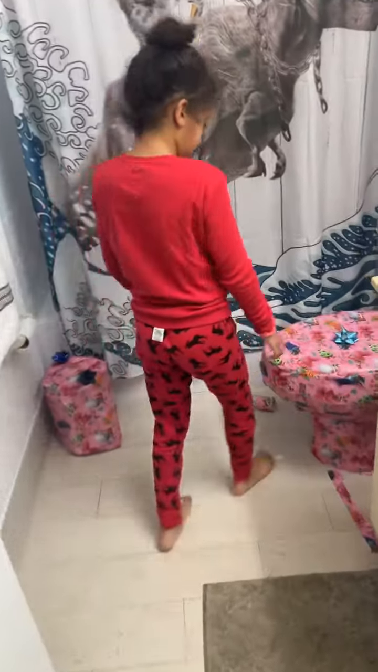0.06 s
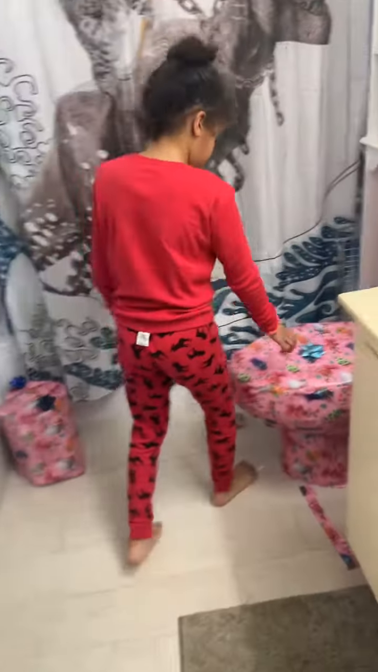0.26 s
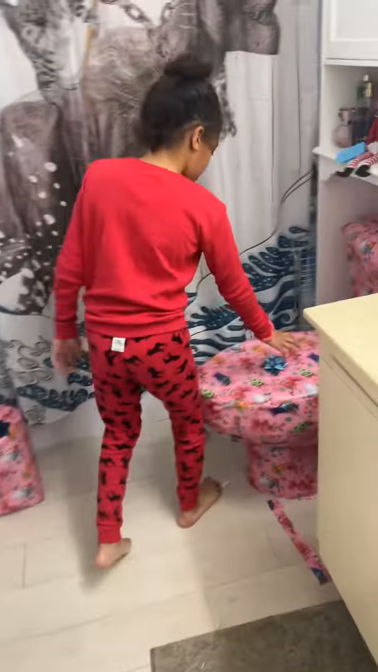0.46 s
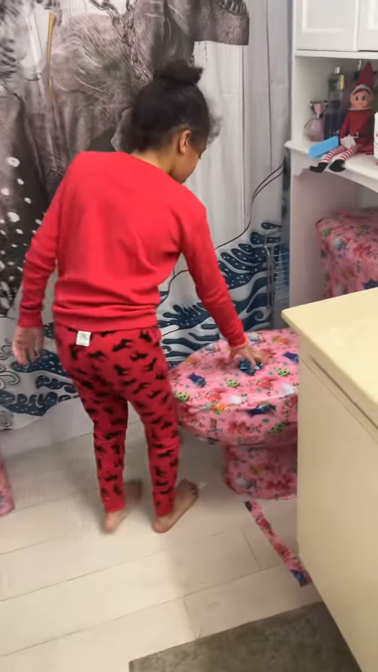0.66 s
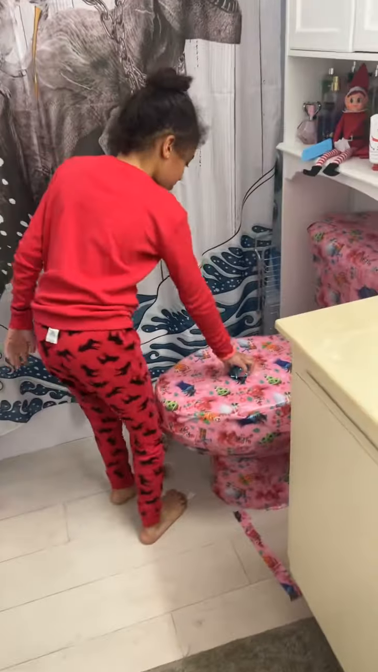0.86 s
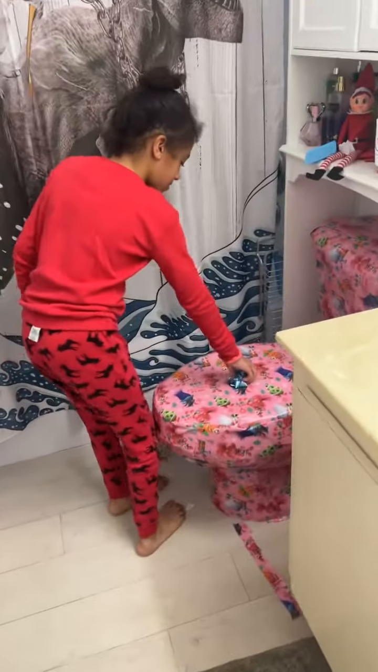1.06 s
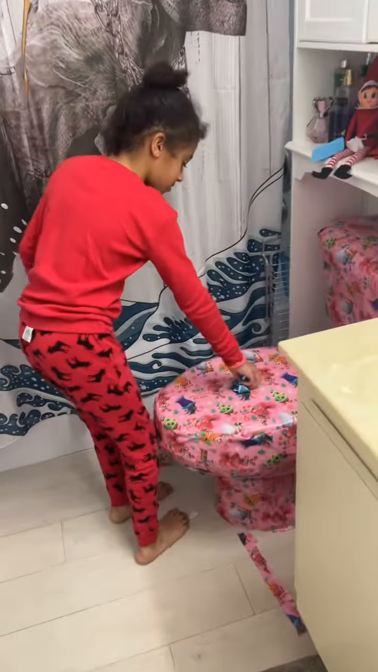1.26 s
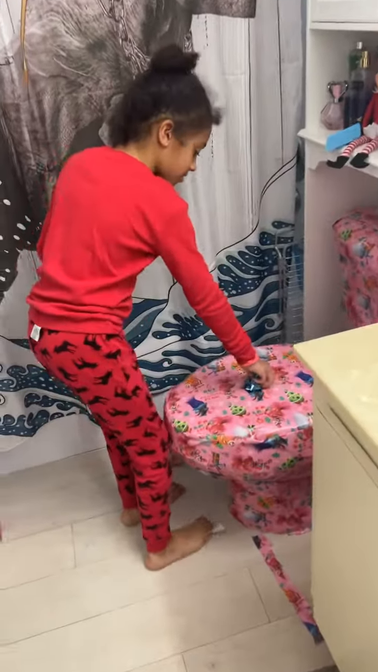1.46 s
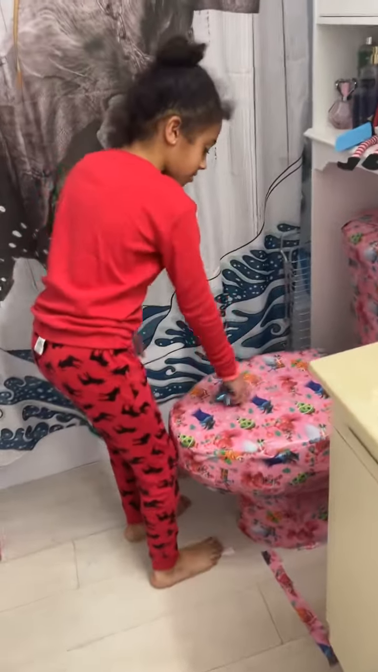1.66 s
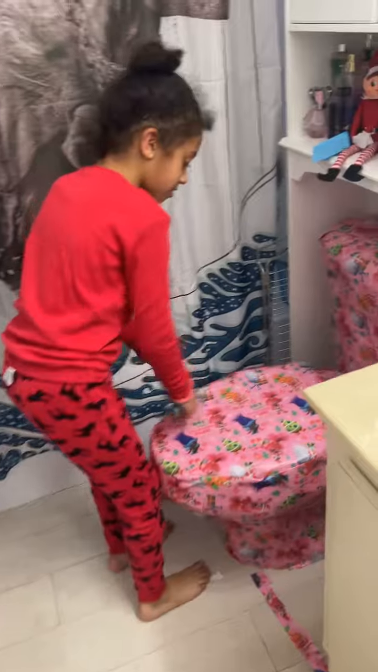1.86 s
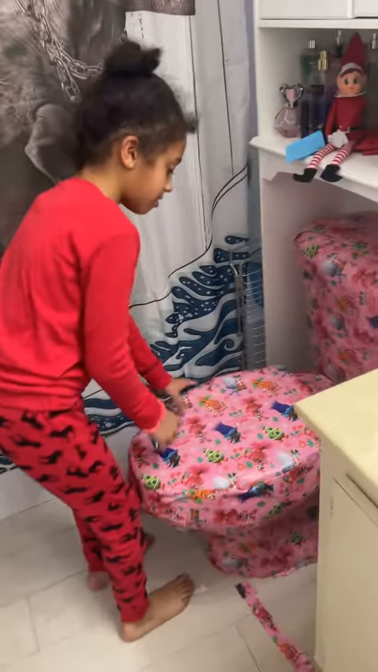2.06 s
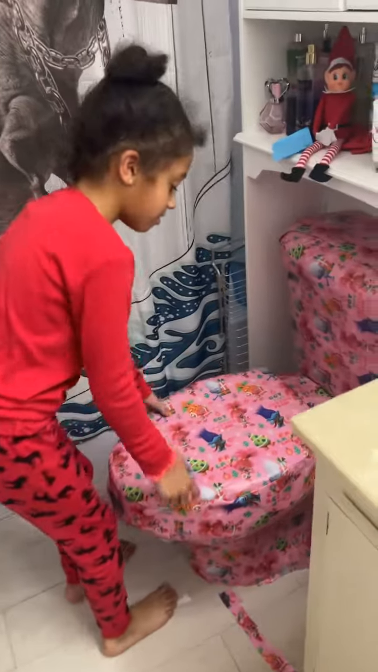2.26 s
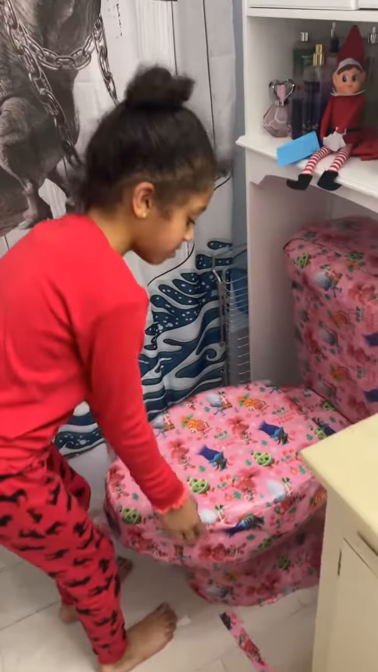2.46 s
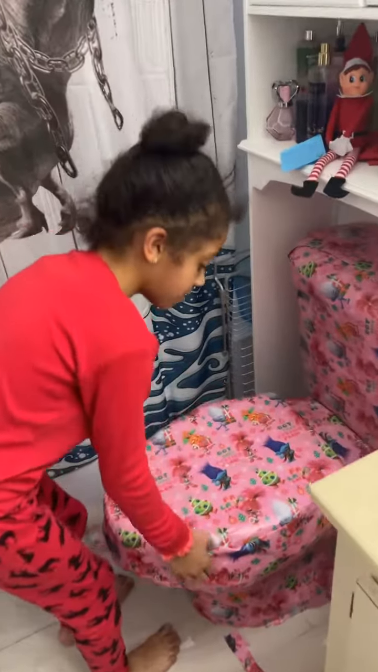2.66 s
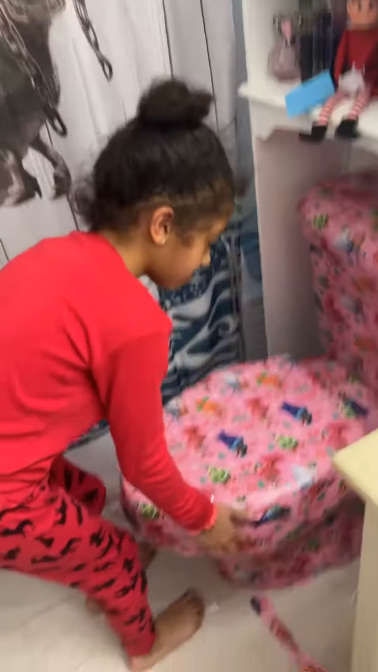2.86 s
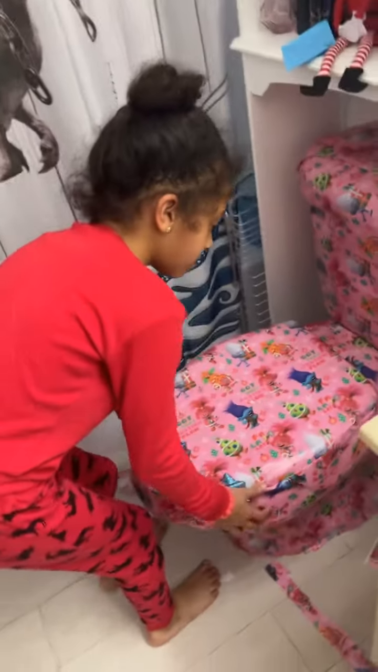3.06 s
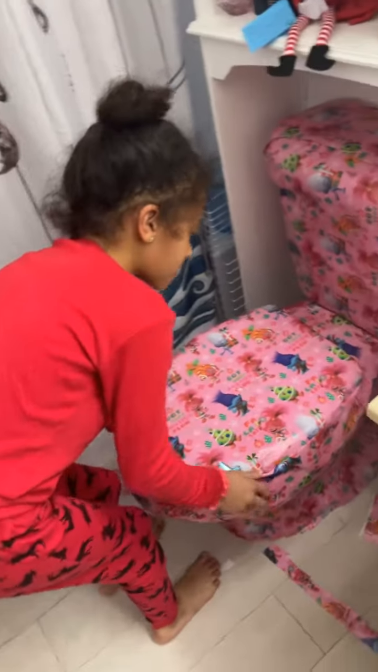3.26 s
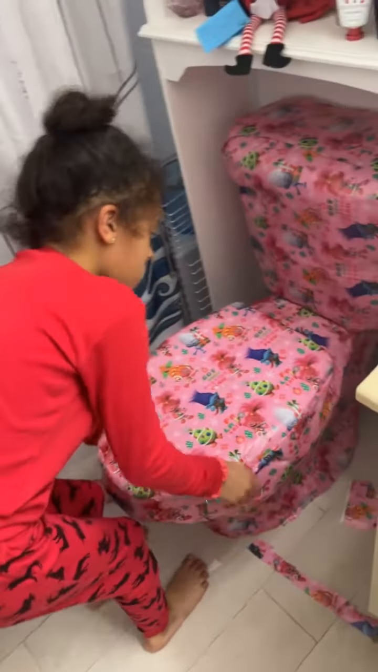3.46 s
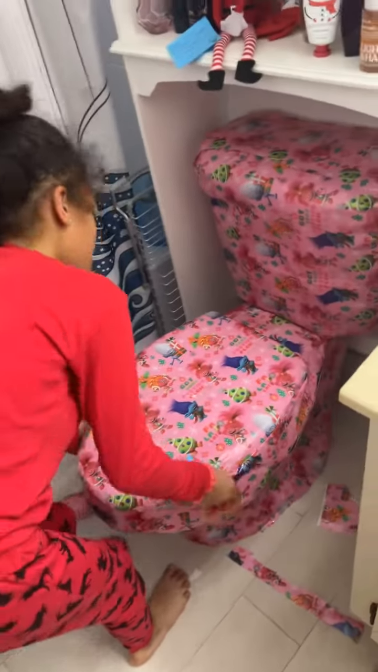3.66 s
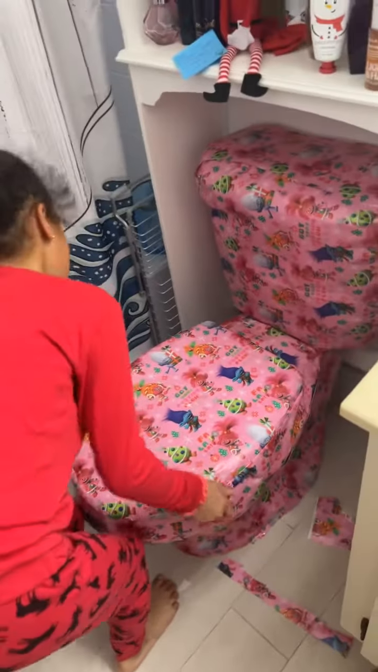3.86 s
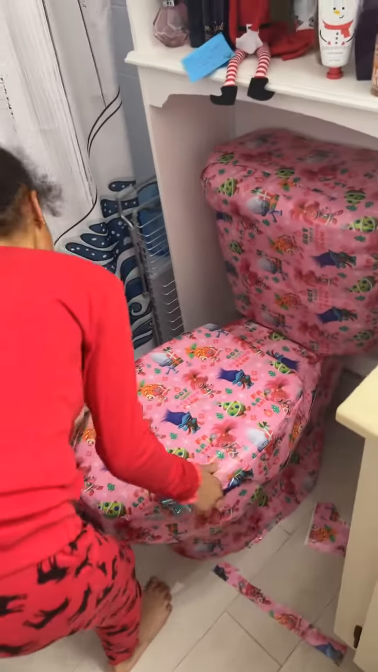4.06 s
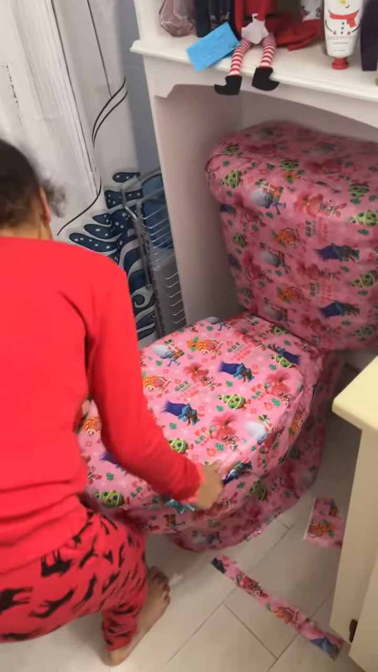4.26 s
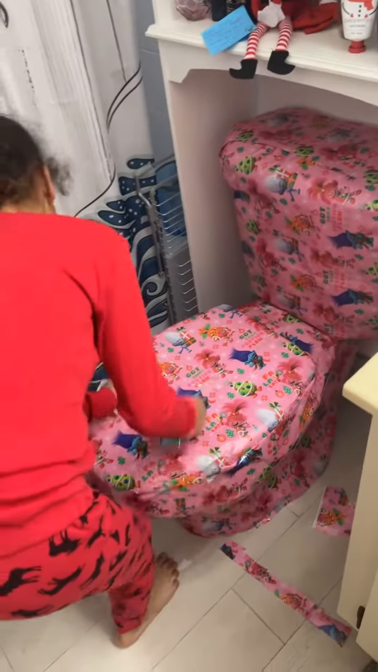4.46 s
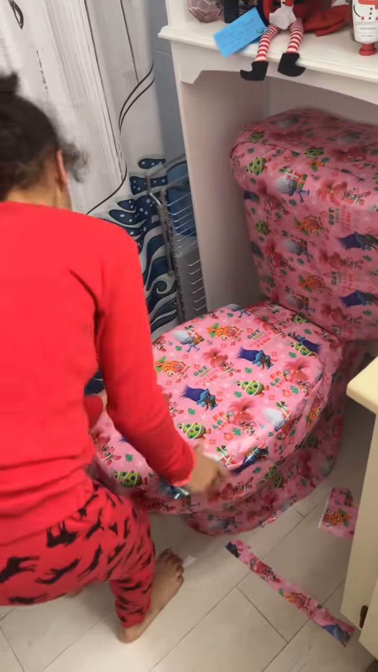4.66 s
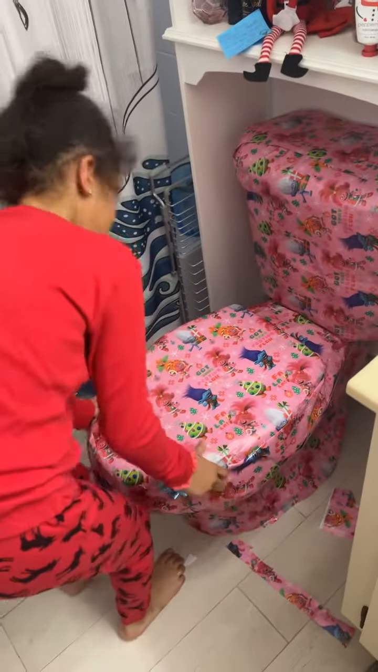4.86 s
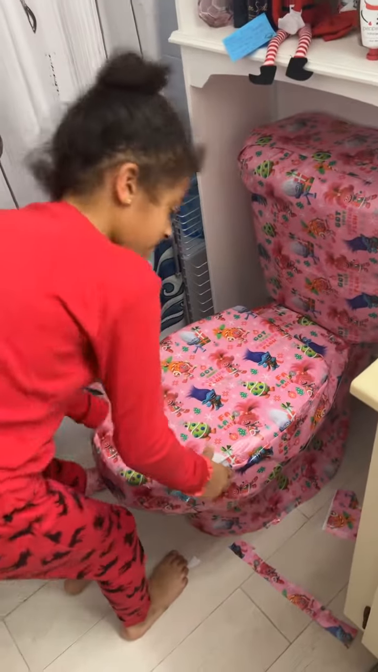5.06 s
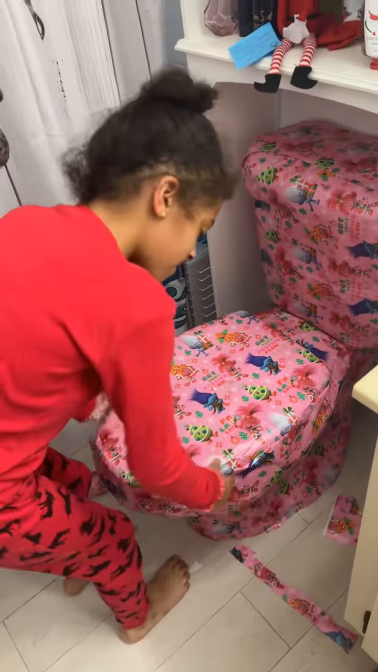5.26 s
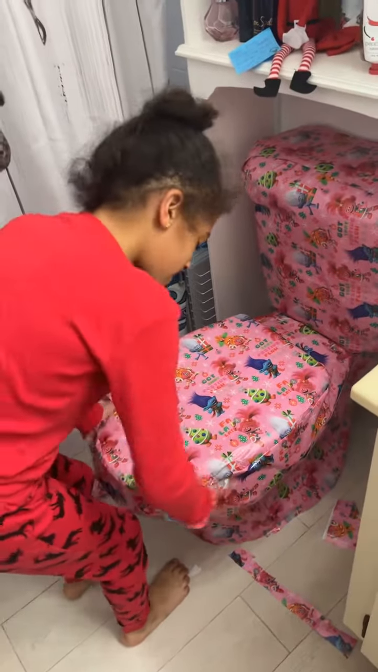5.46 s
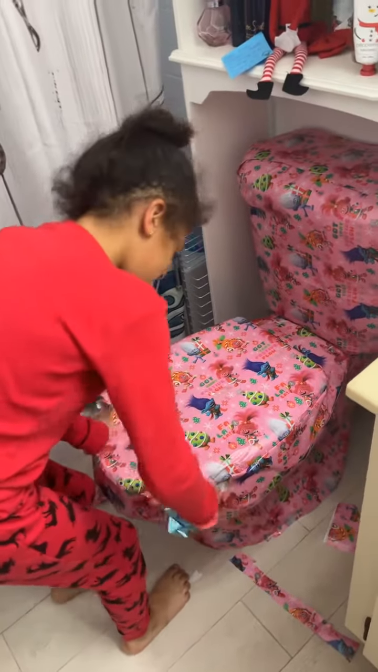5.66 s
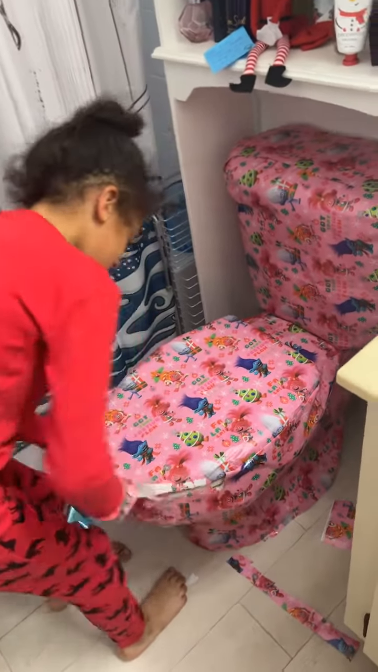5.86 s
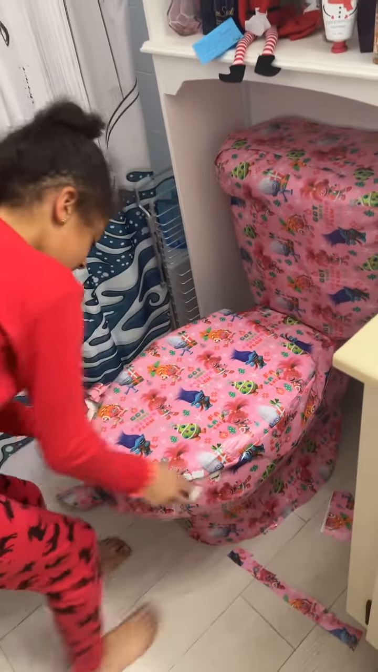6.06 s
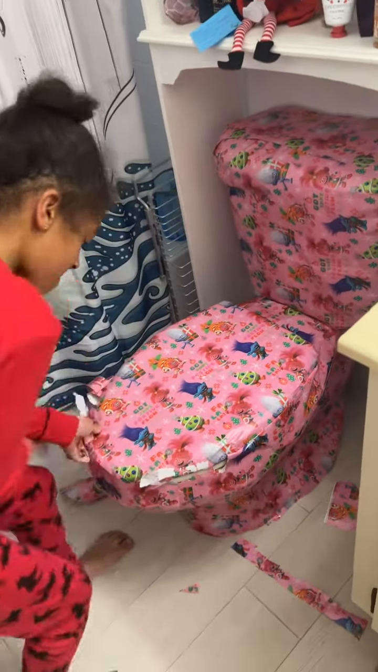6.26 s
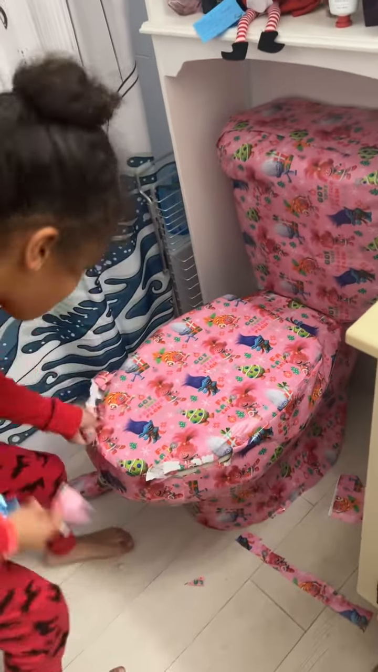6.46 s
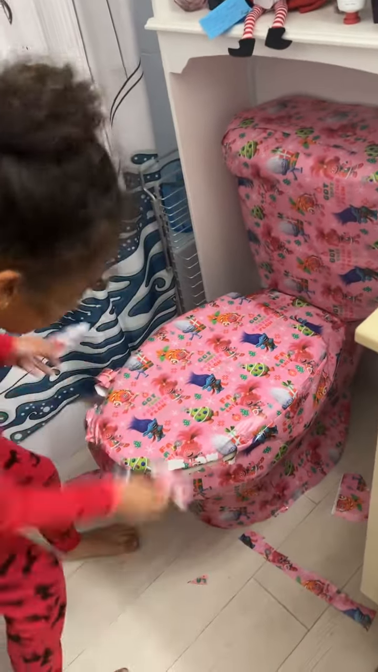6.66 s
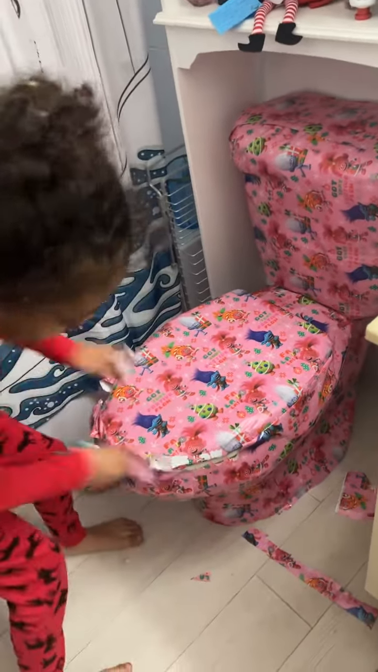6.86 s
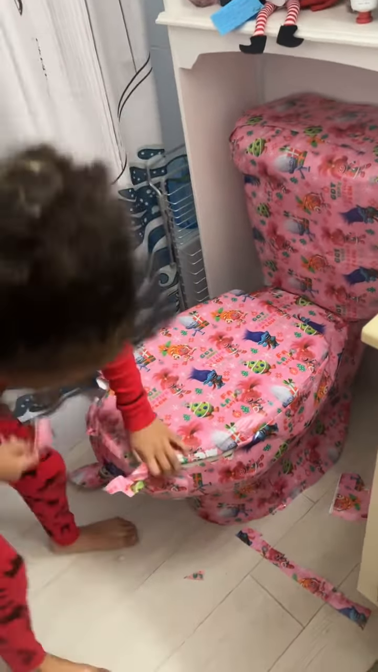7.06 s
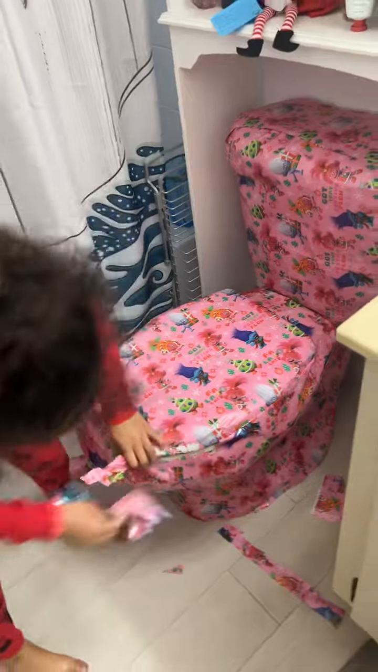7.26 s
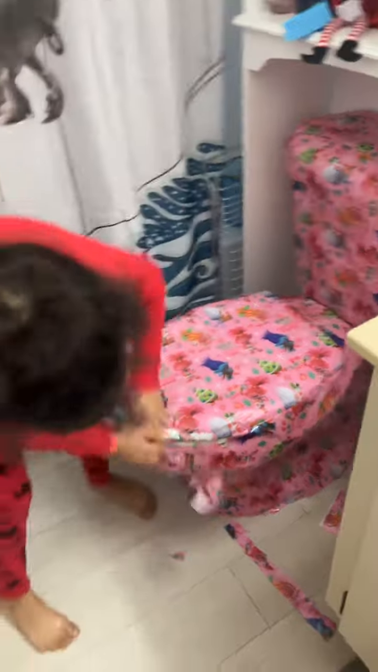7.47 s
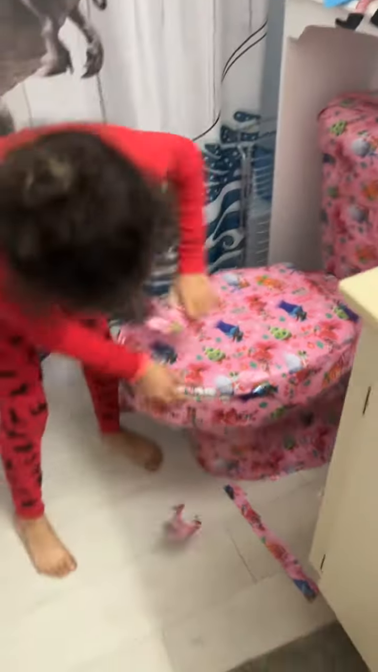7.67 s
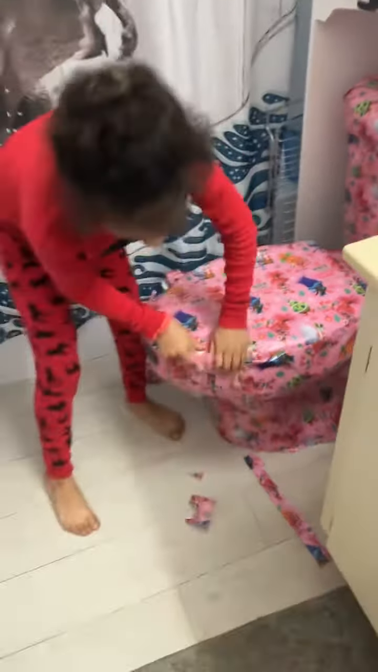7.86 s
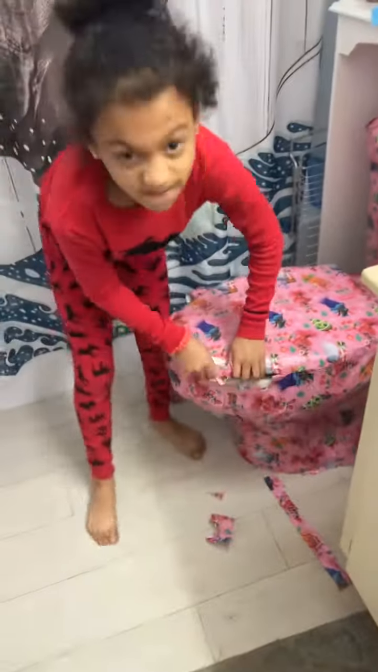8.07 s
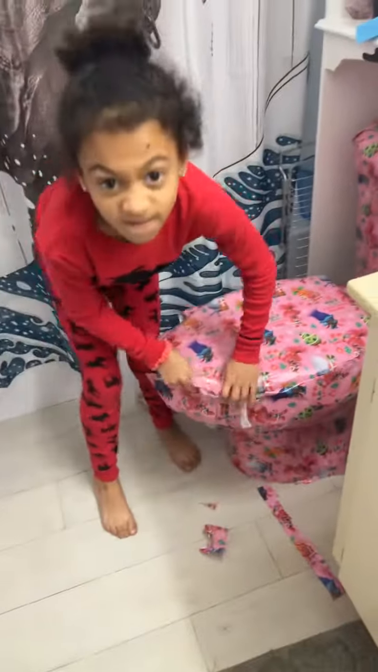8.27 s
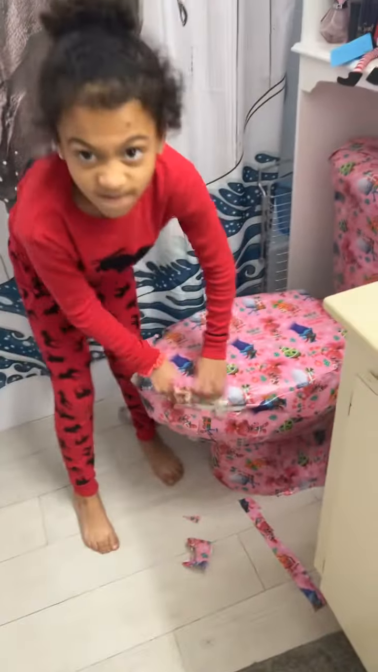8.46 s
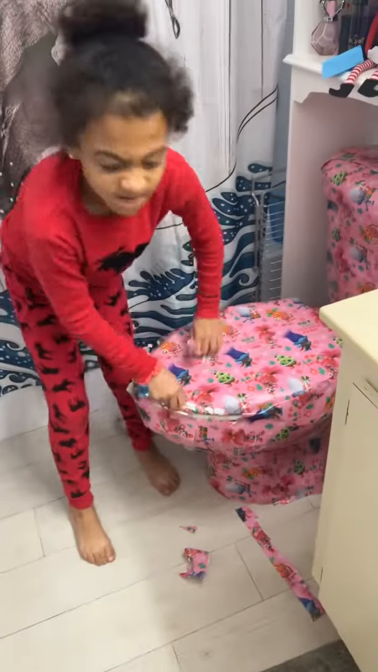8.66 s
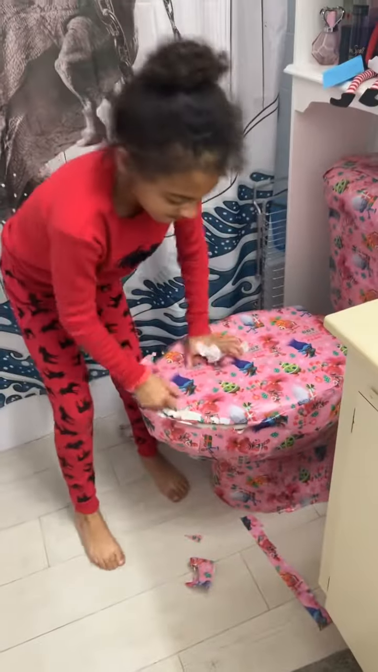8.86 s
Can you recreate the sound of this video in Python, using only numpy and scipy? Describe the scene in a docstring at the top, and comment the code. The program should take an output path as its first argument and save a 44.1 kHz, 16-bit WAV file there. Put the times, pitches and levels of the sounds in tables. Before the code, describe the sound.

Crisp paper is pulled and torn in irregular bursts around a hollow toilet lid. Quiet fumbling and sparse ticks open the scene; after a brief squeaky scrape the crackling thickens. Later tears snap brightly and knock the lid, the strongest ones near the end, before softer crumples. Close single microphone, short hard-walled reflections, faint low room tone.

```python
"""Gift paper on a lidded bowl

Hands scratch, pull and tear thin paper round a hollow lidded bowl in a small hard-walled bathroom.
Buckles and breaking creases ring paper facets; drag noise and blows drive lid and low boom modes.
A finger scrape is a slip train through resonances. Noise tails make the bright room; air is shaped noise.
One microphone.
"""
import sys
import numpy as np
from scipy import signal
from scipy.fft import rfft, irfft
from scipy.io import wavfile

SR = 44100
rng = np.random.default_rng(int(sys.argv[2]) if len(sys.argv) > 2 else 0)


def master_out(mix):
    """Clip the mix to full scale and print it as 16-bit PCM to the path in sys.argv[1]."""
    frames = np.transpose(np.atleast_2d(mix))
    ceiling = np.clip(frames, -1, 1)
    pcm = np.round(ceiling * 32767).astype(np.int16)
    wavfile.write(sys.argv[1], SR, pcm)


N = 393372

# tugs at the sheet: [full strength from t/s, swell/s, hold/s, relative crackle level/dB,
# relative treble/dB, loudest facet f/Hz, relative lid drumming level/dB, relative rumble level/dB]
SHEET_TUGS = [(0.0, 0.06, 0.051, -39, -1.5, 4020, -50, -62), (0.155, 0.1, 0.03, -45.5, 0.5, 3650, -44, -58),
              (0.453, 0.026, 0.0069, -54, 0, 2490.0, -47.5, -36),
              (0.572, 0.006, 0.059, -55, 4, 6000, -57, -47),
              (0.676, 0.0051, 0.012, -34, -25, 3940.0, -54, -24),
              (0.739, 0.092, 0.005, -28, -3.5, 2520, -29.5, -34),
              (0.83, 0.14, 0.081, -45.5, -3, 2530.0, -48, -35),
              (1.186, 0.0061, 0.0084, -39, -4.1, 3170.0, -46, -56),
              (1.274, 0.006, 0.078, -41.5, 0.5, 3180.0, -41, -41.5),
              (1.423, 0.0055, 0.075, -37.5, -6, 3380.0, -47, -28),
              (1.509, 0.006, 0.01, -18.5, -12, 3850, -39.5, -43),
              (1.562, 0.081, 0.058, -28, -5.5, 4200, -39.5, -37),
              (1.877, 0.0054, 0.009, -45, -14, 4410.0, -55, -64),
              (2.143, 0.05, 0.026, -50, 7, 3970.0, -64, -33),
              (2.218, 0.024, 0.049, -38.5, -5, 3050, -46.5, -48),
              (2.343, 0.006, 0.026, -37.5, 0.5, 3180, -44, -29.5),
              (2.479, 0.006, 0.008, -43, 5, 3500, -55, -35),
              (2.593, 0.006, 0.0093, -38.5, -20, 2470, -63, -38),
              (2.68, 0.063, 0.08, -45.5, -8, 2960, -49.5, -38.5),
              (2.795, 0.0069, 0.0085, -36.5, -1, 3450.0, -48, -41),
              (3.182, 0.064, 0.026, -43, -6, 3640.0, -58, -33),
              (3.416, 0.061, 0.061, -29.5, -1.5, 3450, -35, -42),
              (3.535, 0.025, 0.045, -22.5, -1.5, 3400, -27, -23.5),
              (3.624, 0.0061, 0.049, -25.5, 1, 4280, -27.5, -21),
              (3.798, 0.051, 0.011, -29.5, -2, 4560, -37, -31),
              (3.877, 0.045, 0.006, -25, -2.5, 3640, -29.5, -36),
              (3.951, 0.057, 0.086, -29.5, 3, 3780, -34, -27),
              (4.12, 0.09, 0.0047, -31, -3.8, 2960, -36, -31),
              (4.258, 0.006, 0.02, -38, -10, 4000, -34, -50),
              (4.297, 0.076, 0.096, -26.5, 0.5, 4440, -27, -19.5),
              (4.438, 0.045, 0.0053, -56, -4, 3700.0, -31.5, -28),
              (4.601, 0.053, 0.021, -36, -2, 3580.0, -30.5, -29),
              (4.718, 0.041, 0.012, -39.5, -1, 3270.0, -35.5, -31),
              (4.825, 0.04, 0.099, -35, 0, 2800, -33.5, -27),
              (5.024, 0.069, 0.0037, -40, 6, 4350.0, -38, -25),
              (5.099, 0.0041, 0.098, -32.5, 2.5, 3960, -30, -28),
              (5.441, 0.094, 0.011, -34, 0.5, 2950.0, -36.5, -34),
              (5.61, 0.077, 0.069, -31.5, -2, 4300, -31, -44),
              (5.714, 0.12, 0.096, -29, 1.5, 4970, -39, -27),
              (5.8, 0.027, 0.013, -25.5, 5.5, 3700, -14, -16),
              (6.082, 0.058, 0.1, -30.5, 5.5, 4030, -29, -27.5),
              (6.33, 0.0029, 0.0083, -23, 4, 2620, -15.5, -14),
              (6.536, 0.026, 0.0039, -39, -1, 2770.0, -40.5, -46),
              (6.667, 0.014, 0.03, -37, 4, 3190.0, -29.5, -25),
              (6.727, 0.006, 0.12, -43, 7, 3350.0, -35.5, -26),
              (6.833, 0.018, 0.012, -28, 1, 3670.0, -27, -37),
              (6.954, 0.0078, 0.011, -35.5, 2.5, 2450.0, -29, -17),
              (7.039, 0.015, 0.0025, -33.5, -8, 3030.0, -36.5, -51),
              (7.158, 0.062, 0.036, -44.5, -6, 3410.0, -42, -32),
              (7.337, 0.0075, 0.011, -32.5, -6, 4400.0, -33, -21.5),
              (7.448, 0.02, 0.04, -26, 1.5, 4180, -26, -17.5),
              (7.585, 0.0077, 0.048, -43.5, 7, 4790.0, -54, -32),
              (7.683, 0.05, 0.15, -29, -9, 3740, -38.5, -30),
              (7.991, 0.0087, 0.04, -19.5, 0, 2450, -21, -13.5),
              (8.122, 0.061, 0.18, -37, -0.5, 2070.0, -53, -55.0),
              (8.232, 0.013, 0.026, -23.5, -19, 1690, -19, -11.5),
              (8.464, 0.042, 0.075, -42.5, 9, 5700, -48, -32),
              (8.67, 0.038, 0.0039, -31, 1.5, 5780.0, -34, -40),
              (8.782, 0.064, 0.16, -48.5, 3.5, 3750.0, -45, -22.5),
              (8.851, 0.033, 0.078, -50, 4.5, 3500, -33.5, -30)]
# idle rustle between tugs: [t/s, relative crackle level/dB]
IDLE_RUSTLE = [(0.0, -50.5), (0.5, -66), (0.8, -66), (1.1, -51), (1.7, -50), (1.98, -60), (2.2, -50),
               (3.1, -47.5), (3.4, -40.5), (4.1, -42), (4.5, -48.5), (5.3, -43.5), (5.55, -47.5),
               (5.9, -36), (6.4, -37), (6.62, -58.5), (6.8, -52), (7.28, -50.5), (7.9, -34.5), (8.4, -44.5),
               (8.92, -62)]
# resting spectrum of the paper: [f/Hz, relative level/dB per Hz]
PAPER_SPECTRUM = [(569, 6), (888, -21.5), (982, 1), (1100, -5.5), (4310, -8), (9240, -13.5), (12100, -25),
                  (15500, -8)]
# lid modes: [f/Hz, relative level/dB, t60/s]; knocks shorten t60
LID_MODES = [(300, -9, 0.062), (386, -5, 0.036), (565.6, -14, 0.17), (666, -11.5, 0.047), (707, -11, 0.028),
             (835, -10, 0.057), (964, -7, 0.076), (1006, -8, 0.079), (1830, -10.5, 0.022),
             (1976, -11, 0.015)]
# low body modes: [f/Hz, relative level/dB, t60/s]; blows shorten t60
BOOM_MODES = [(59, -20, 0.26), (76.7, -5.5, 0.47), (94, -3.5, 0.088), (118, 2, 0.13), (141.4, 0, 0.23),
              (191, -10, 0.26), (264, 1, 0.061)]
# knocks on the lid and steps on the floor:
# [t/s, relative knock level/dB, lid f/Hz, boom level against knock/dB, boom centre f/Hz]
BLOWS = [(0.1, -30, 497, -18, 78.1), (0.184, -28, 517, -19, 61.9), (0.626, -27, 300, 4.5, 118),
         (0.689, -30, 1000, -6, 124), (1.298, -31, 417, 0, 68), (1.44, -22, 547, -3, 68),
         (1.51, -28, 517, 19, 60), (3.038, -37.5, 646, 8.5, 77.6), (3.193, -22.5, 608, -6, 100),
         (3.272, -13.5, 620, -38, 132), (3.647, -17, 1010, -2, 148), (4.301, -16, 1000, -2, 110),
         (4.429, -11.5, 430, -13.5, 143), (4.601, -22.5, 300, -2, 114), (4.847, -27, 300, -28, 110),
         (5.445, -24, 700, -17, 133), (5.595, -23, 554, -9, 135), (5.806, -6, 832, -8.5, 129),
         (6.097, -17.5, 571, -0.5, 125), (6.328, -4, 900, -26, 156), (6.677, -14.5, 403, -15, 133),
         (6.836, -13, 586, -22, 156), (6.958, -22, 900, -2, 114), (7.11, -15, 620, -23, 156),
         (7.342, -16, 300, -24, 124), (7.454, -17.5, 300, -19, 110), (7.652, -22.5, 300, -3, 119),
         (7.994, -5.5, 720, -18, 126), (8.2312, -1, 826, 1.5, 92), (8.67, -26.5, 947, 6, 96),
         (8.786, -16, 300, -5, 147), (8.851, -11.5, 308, -7, 125)]
# background air: [f/Hz, relative level/dB per Hz]
AIR_SPECTRUM = [(30, 21.5), (130, -2), (443, -10), (1170, -23), (4420, -28), (15500, -25)]
# room decay: [f/Hz, t60/s]
ROOM_DECAY = [(100, 0.21), (1000, 0.16), (4000, 0.13), (12000, 0.17)]
# creases and tape snapping: [t/s, relative peak level/dB, relative treble/dB, loudest facet f/Hz]
CREASE_SNAPS = [(0.672, -6, -27, 4550), (0.73, -13, -26, 3560), (1.078, -25.5, -8, 6130),
                (1.1839, -12.5, -15, 6100), (1.2718, -11.5, -20, 4750), (1.4206, -11.5, -14, 4670),
                (1.4667, -11.5, -3, 2120), (1.499, -13, -9, 6000), (1.507, -9.5, -6, 13300),
                (1.518, -21, -14, 3660), (1.878, -25.5, -5.5, 4700), (2.117, -28, -42, 2020),
                (2.147, -16, -22, 4700), (2.187, -21.5, -3, 5450), (2.341, -25, -5, 5500),
                (2.475, -15.5, -17, 7300), (2.589, -23, -20.0, 2300), (2.696, -18.5, -27, 4700),
                (2.753, -23.5, -6, 8400), (2.7933, -20, -10, 6300), (3.164, -28, -5, 5500),
                (3.216, -14.5, -15.0, 4700), (3.272, -23, -12, 5500), (3.3947, -12, -12.0, 4100),
                (3.4255, -16.5, -4, 9600), (3.438, -13, -2, 6300), (3.513, -15.5, -3.5, 6200),
                (3.523, -14, -7, 6000), (3.5341, -17, -4, 5500), (3.6267, -12.5, 1, 6250),
                (3.6517, -10, -17, 5500), (3.76, -17, -8, 5500), (3.7967, -12.5, -2, 4730),
                (3.932, -16, -12, 6300), (3.9762, -3, -25, 4700), (4.125, -11, -26.0, 3720),
                (4.1867, -21, -6.5, 8400), (4.2544, -10, -9.5, 5330), (4.3462, 0.5, -22, 5600),
                (4.603, -6, -24, 4730), (4.714, -17, -18, 5500), (4.7743, -30, 0.5, 11100),
                (4.827, -14, -13, 1690), (4.945, -21, -8, 8000), (5.098, -21, -6, 13000),
                (5.419, -26, 0, 8000), (5.439, -15, -18, 2240), (5.611, -7, -13, 6100),
                (5.666, -8, -9, 4030), (5.7135, -12.5, -6, 11300), (6.007, -18, -6, 4700),
                (6.11, -8, -11, 6300), (6.177, -11.5, -9, 8800), (6.2563, -22.5, -4, 8400),
                (6.3282, 3.5, -13, 9400), (6.6707, -10.5, -13.5, 9600), (6.725, -14.5, -3.5, 3100),
                (6.7898, -9, -19, 9700), (6.8284, -23, 3, 9700), (6.9534, -18, -4.5, 1960),
                (7.045, -11, -9.5, 2320), (7.168, -12, -14, 3400), (7.3396, -6.5, -22, 4670),
                (7.424, -21, -11, 6300), (7.444, -11.5, -15, 4700), (7.584, -13, -7.5, 5500),
                (7.774, -21, -5.5, 13000), (7.989, 3, -9.5, 11600), (8.137, -6, -17, 9600),
                (8.2331, 4, -13, 1680), (8.6122, -29, -1, 9600), (8.651, -32, 9, 6300),
                (8.675, -17.5, 5, 5450)]
# finger dragged over the taut sheet: [t/s, level/dB, mean slips per s, opening hollow f/Hz]
FINGER_SCRAPE = [(2.926, -50, 150, 1300), (2.94, -33, 300, 1900), (2.972, -27.5, 900, 2400),
                 (3.005, -30, 1500, 3000), (3.055, -46, 1500, 2800)]

AIR_DB = -44.5
SWELL_DB, LET_GO_DB_PER_S = 24.5, 306
RUMBLE_LAG_S, RUMBLE_LET_GO_DB_PER_S = 0.0037, 230  # the heavy body follows late
# idle drumming and rumble are relative to idle crackle
IDLE_TREBLE_DB, IDLE_HZ, IDLE_DRUM_DB, IDLE_RUMBLE_DB = -1.5, 3070, 0, 4
SCRAPE_LOW_HZ = 1000
MIC_LOW_HZ, CUTOFF_HZ = 55, 15750
TINY = 1e-18  # keeps recursive filters off denormals


def from_db(db):
    """Decibels to amplitude gain."""
    return 10 ** (np.asarray(db) / 20)


def rms_one(x):
    """Scale to unit rms."""
    return x / np.sqrt(np.mean(x ** 2) + 1e-20)


def at_hz(points, hz):
    """Interpolate a curve on a log-frequency axis."""
    points = np.array(points)
    return np.interp(np.log(hz), np.log(points[:, 0]), points[:, 1])


def in_time(rows):
    """Columns of a curve table, one value a sample."""
    s, *columns = np.transpose(rows)
    return [np.interp(np.arange(N) / SR, s, column) for column in columns]


def drift(pole_hz):
    """Slow chance of rms 1: two-pole noise, computed every 40 samples."""
    r = np.exp(-80 * np.pi * pole_hz / SR)
    noise = rng.standard_normal(N // 40 + 2002)
    slow = signal.lfilter([1], [1, -2 * r, r * r], noise)[2000:]  # drop the settling part
    return np.interp(np.arange(N) / 40, np.arange(len(slow)), rms_one(slow))


def impulses(times_s, gains):
    """A click train."""
    train = np.zeros(N)
    samples = np.round(np.asarray(times_s) * SR).astype(int)
    np.add.at(train, np.minimum(samples, N - 1), gains)
    return train


def ring(force, hz, t60_s):
    """Mode resonator: a unit click starts a decaying sine of initial height 1."""
    r, w = from_db(-60 / (t60_s * SR)), 2 * np.pi * hz / SR
    return signal.lfilter([0, np.sin(w)], [1, -2 * r * np.cos(w), r * r], force + TINY)


def facet(force, hz, cycles):
    """Paper patch: decays 60 dB in the given cycles; gain about 1 at its pitch, 0 at the extremes."""
    r, w = from_db(-60 * hz / (cycles * SR)), 2 * np.pi * hz / SR
    feed = np.array([1, 0, -1]) * (1 - r * r) / 2
    return signal.lfilter(feed, [1, -2 * r * np.cos(w), r * r], force + TINY)


def decay(force, time_s):
    """Each click starts an exponential decay with this time constant."""
    return signal.lfilter([1], [1, -np.exp(-1 / (time_s * SR))], force + TINY)


def near_pitch(hz, centre_hz, octaves):
    """1 at the centre, a bell on a log-frequency axis."""
    return np.exp(-.5 * (np.log2(hz / centre_hz) / octaves) ** 2)


def treble_share(hz):
    """0 at 3 kHz, 1 at 10 kHz, linear in octaves and unbounded."""
    return np.log2(hz / 3000) / np.log2(10000 / 3000)


def tug_powers(level_db, idle_db, lag_s, let_go_db_per_s):
    """Power of each tug (swell, hold, let go) and of the idle rustle, every 2 ms."""
    t = np.arange(0, N / SR + .002, .002)
    s, swell_s, hold_s = np.transpose(SHEET_TUGS)[:3, :, None]
    since_s = t - lag_s - s
    rise_db = SWELL_DB * since_s / np.maximum(swell_s, .002)
    fall_db = let_go_db_per_s * (hold_s - since_s)
    shape_db = np.minimum(0, np.minimum(rise_db, fall_db))
    idle = np.interp(t, *np.transpose(IDLE_RUSTLE)) + idle_db
    return t, from_db(np.vstack([level_db[:, None] + shape_db, idle])) ** 2


def hands():
    """Tugs and idle rustle add in power; their shares weight the crackle colour."""
    _, _, _, crackle_db, treble_db, centre_hz, drum_db, rumble_db = np.transpose(SHEET_TUGS)
    t, power = tug_powers(crackle_db, 0, 0, LET_GO_DB_PER_S)
    drum = tug_powers(drum_db, IDLE_DRUM_DB, 0, LET_GO_DB_PER_S)[1]
    rumble = tug_powers(rumble_db, IDLE_RUMBLE_DB, RUMBLE_LAG_S, RUMBLE_LET_GO_DB_PER_S)[1]
    levels_db = [10 * np.log10(p.sum(axis=0)) for p in (power, drum, rumble)]
    share = power / power.sum(axis=0)
    colours = [np.append(treble_db, IDLE_TREBLE_DB) @ share, np.append(centre_hz, IDLE_HZ) @ share]
    return in_time(np.transpose([t, *levels_db, *colours]))


def crackle(level_db, treble_db, drum_excess_db, centre_hz, per_s, spread_db, cycles, count=22):
    """Tiny buckles come in clumps; each rings a few cycles at the pitch of its facet."""
    sizes = from_db(spread_db * np.minimum(rng.exponential(1, N), 4)) * rng.choice([-1, 1], N)
    clumps = from_db(.8 * drift(50) + 1.8 * drift(200))
    busy = from_db(np.clip(.5 * (level_db + 48), -3, 8))  # harder pulls buckle more often
    happens = rng.random(N) < per_s * busy * clumps / SR
    buckles = sizes * clumps * happens / np.sqrt(busy)
    groups = count // 2
    dealt = rng.integers(0, groups, N)  # each buckle drives two facet sizes
    out = np.zeros(N)
    for k, hz in enumerate(np.geomspace(600, 15000, count)):
        share = treble_share(hz)
        # small facets follow the treble; large ones sound when the sheet is pressed on the lid
        small_db = (treble_db + 3.0) * max(share, 0)
        large_db = (drum_excess_db + 7.0) * 0.74 * max(-share, 0)
        fold_db = 7.0 * near_pitch(hz, centre_hz, 0.81)  # fold in hand sets the loudest facet size
        colour_db = at_hz(PAPER_SPECTRUM, hz) + 10 * np.log10(hz / 3000)
        once = facet(buckles * (dealt == k % groups), hz, cycles)
        rung = rms_one(facet(once, hz, cycles))
        out += rung * from_db(colour_db + small_db + large_db + fold_db + 1.45 * drift(27.0))
    return from_db(level_db) * out


def body(modes, rub_db, blow_db, centre_hz, focus_db, contact_s, grain_db, held):
    """Modes shaken by sheet drag and struck by blows; a resting hand cuts struck t60 to share held."""
    s = np.array(BLOWS)[:, 0]
    soft = np.exp(-1 / (contact_s * SR))
    strengths_db = 1.8 * rng.standard_normal((len(s), len(modes)))  # new for every blow
    rubbed, struck = np.zeros(N), np.zeros(N)
    for k, (hz, level_db, t60_s) in enumerate(modes):
        drag = from_db(rub_db + grain_db * drift(26.7)) * rng.standard_normal(N)
        noise_gain = np.sqrt(t60_s * SR / (4 * np.log(1000)))  # rms gain of the mode for white noise
        rubbed += ring(drag, hz, t60_s) * from_db(level_db) / noise_gain
        spot_db = focus_db * near_pitch(hz, centre_hz, 0.31)  # where the blow lands picks the modes
        blows = impulses(s, from_db(blow_db + level_db + spot_db + strengths_db[:, k]))
        contact = signal.lfilter([1 - soft], [1, -soft], blows + TINY)
        struck += ring(contact, hz, held * t60_s) * (-1) ** k
    return rubbed, struck


def shaped_noise(spectrum):
    """Steady Gaussian noise with a given spectrum; rms 1."""
    hz = np.maximum(np.fft.rfftfreq(N, 1 / SR), 10)
    return rms_one(irfft(rfft(rng.standard_normal(N)) * from_db(at_hz(spectrum, hz)), N))


def bathroom(x, first_s, moves_per_s, count=5):
    """Hard-wall reflections: octave-band noise decays, a different pattern per part of the sheet."""
    t, tails = np.arange(SR // 2) / SR, 0
    for hz in 125 * 2.0 ** np.arange(8):
        edges_hz = [hz / np.sqrt(2), min(hz * np.sqrt(2), .45 * SR)]
        band = signal.butter(2, edges_hz, "band", fs=SR, output="sos")
        noise = signal.sosfilt(band, rng.standard_normal((count, len(t))))
        tails = tails + noise * from_db(-60 * t / at_hz(ROOM_DECAY, hz))
    tails *= np.clip(t / first_s, 0, 1) ** 2  # reflections fade in
    place = np.arange(N) / SR * moves_per_s % count  # cycles through the parts
    out = np.zeros(N)
    for k, tail in enumerate(tails):
        distance = np.abs((place - k + 1) % count - 1)
        here = np.sqrt(np.clip(1 - distance, 0, 1))  # share sent from place k
        out += signal.oaconvolve(x * here, tail / np.sqrt(np.sum(tail ** 2)))[:N]
    return out


def snaps(burst_s, burst_db, crack_s, crack_db, cycles, scatter_db, focus_db, count=14):
    """A crease breaks with a click, a dense short crack and a longer fray, in its own colour."""
    s, peak_db, treble_db, centre_hz = np.transpose(CREASE_SNAPS)
    clicks, frays = np.zeros(N), np.zeros(N)
    scatter = scatter_db * rng.standard_normal((len(s), count))
    for k, hz in enumerate(np.geomspace(1200, 15000, count)):
        tilt_db = (treble_db + 9.0) * max(treble_share(hz), -.25)
        loudest_db = focus_db * near_pitch(hz, centre_hz, 0.12)
        breaks = impulses(s, from_db(peak_db + tilt_db + scatter[:, k] - 13.5 + loudest_db))
        clicks += facet(breaks * np.sqrt(4000 / hz), hz, cycles) * (-1) ** k
        envelope = from_db(crack_db) * decay(breaks, crack_s) + decay(breaks, burst_s)
        fray = envelope * rng.standard_normal(N)
        frays += facet(from_db(burst_db) * fray, hz, cycles)
    return clicks, frays


def scrape(low_db, cycles, hiss_db):
    """Finger slips vary in rate with its speed; one resonance stays, one opens upward."""
    first, last = int(FINGER_SCRAPE[0][0] * SR), int(FINGER_SCRAPE[-1][0] * SR)
    level_db, per_s, open_hz = (c[first:last] for c in in_time(FINGER_SCRAPE))
    size = len(per_s)
    slip_count = np.floor(np.cumsum(per_s * rng.exponential(1, size)) / SR)
    slips = np.diff(slip_count, prepend=0) * rng.normal(1, 0.59, size)
    force = slips * np.sqrt(SR / per_s) + from_db(hiss_db) * rng.standard_normal(size)
    low = facet(facet(force, SCRAPE_LOW_HZ, cycles / 2), SCRAPE_LOW_HZ, cycles / 2)
    opening = np.zeros(size)
    for k, hz in enumerate(np.geomspace(1200, 6000, num=8)):
        opening += facet(force, hz, cycles) * near_pitch(hz, open_hz, .45) / np.sqrt(hz) * (-1) ** k
    out = np.zeros(N)
    mix = from_db(low_db) * rms_one(low) + rms_one(opening)
    out[first:last] = from_db(level_db) * rms_one(mix)
    return out


def scene():
    """Paper, lid and low body in the room over a quiet floor."""
    crackle_db, drum_db, rumble_db, treble_db, crackle_hz = hands()
    _, knock_db, lid_hz, boom_db, boom_hz = np.transpose(BLOWS)
    rustle = crackle(crackle_db - 10.5, treble_db, drum_db - crackle_db, crackle_hz,
                     per_s=3000, spread_db=1.0, cycles=2.62)
    drum, taps = body(LID_MODES, drum_db - 11.0, knock_db - 11.0, lid_hz, focus_db=10.3,
                      contact_s=0.00022, grain_db=-4.5, held=0.4)
    rumble, thuds = body(BOOM_MODES, rumble_db - 15.5, knock_db + boom_db - 20.0, boom_hz, focus_db=24.3,
                         contact_s=0.000077, grain_db=4.5, held=0.66)
    clicks, frays = snaps(burst_s=0.014, burst_db=-13.5, crack_s=0.0038, crack_db=2.0,
                          cycles=7.2, scatter_db=3.0, focus_db=14.5)
    sheet = rustle + scrape(low_db=-1.0, cycles=5.0, hiss_db=-3.0) + drum
    near = sheet + from_db(13.0) * clicks + from_db(1.5) * frays + from_db(7.5) * taps
    to_walls = sheet + from_db(17.0) * clicks + from_db(5.5) * taps
    wet = from_db(-2.0) * bathroom(to_walls, first_s=0.0013, moves_per_s=60, count=8)
    air = from_db(AIR_DB) * shaped_noise(AIR_SPECTRUM)
    mono = near + wet + rumble + thuds + air
    return np.array([mono, mono])


def record(dry):
    """The small microphone loses the deepest bass, peaks are rounded, the top is cut."""
    bass_cut = signal.butter(4, MIC_LOW_HZ, "high", fs=SR, output="sos")
    thin = signal.sosfilt(bass_cut, dry)
    rounded = .95 * np.tanh(thin / .95)
    top_cut = signal.ellip(10, .5, 65, CUTOFF_HZ, fs=SR, output="sos")  # .5 dB ripple, 65 dB stop
    return signal.sosfilt(top_cut, rounded)


dry = scene()
out = record(dry)
master_out(out)
```